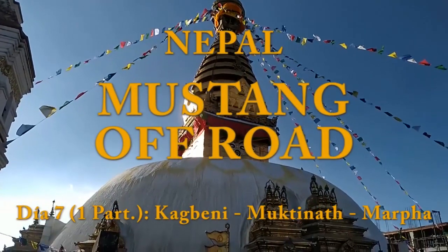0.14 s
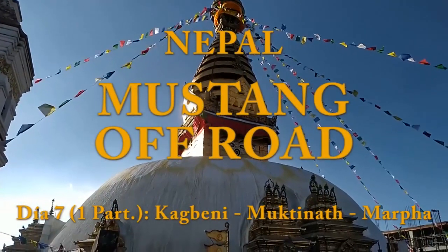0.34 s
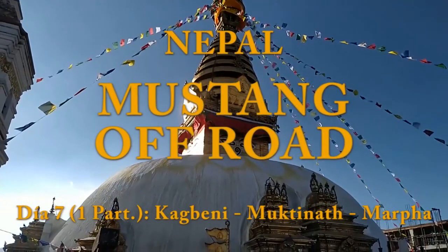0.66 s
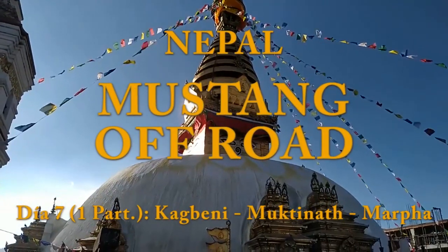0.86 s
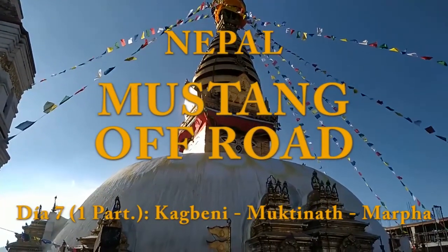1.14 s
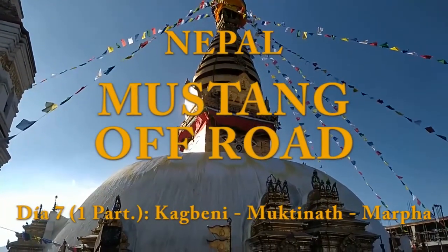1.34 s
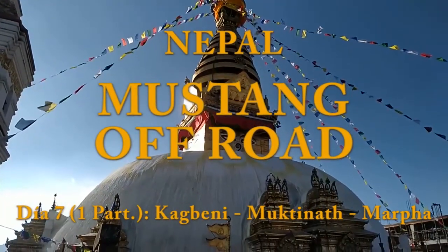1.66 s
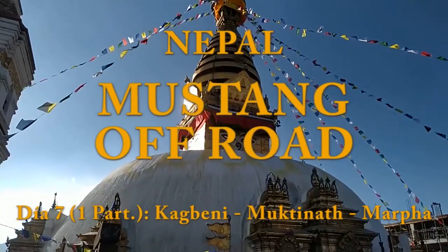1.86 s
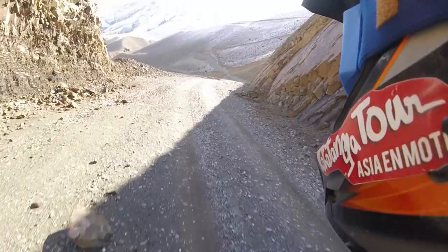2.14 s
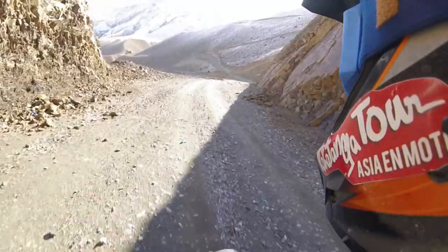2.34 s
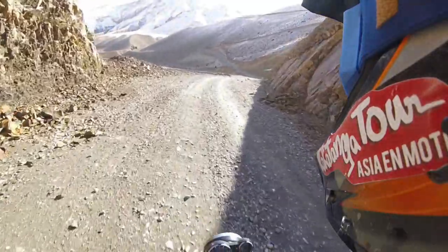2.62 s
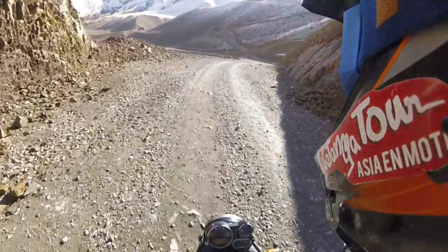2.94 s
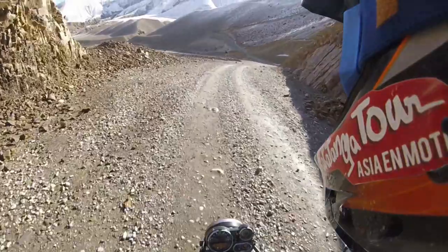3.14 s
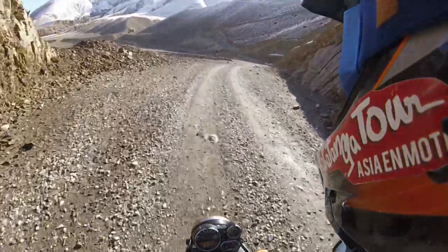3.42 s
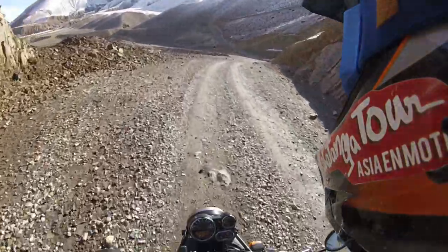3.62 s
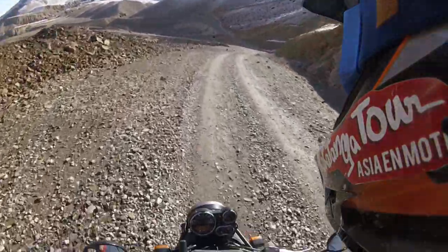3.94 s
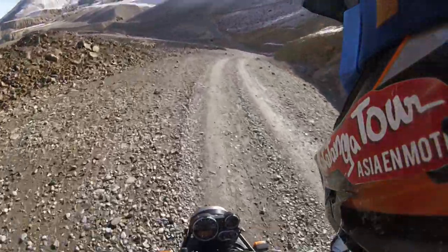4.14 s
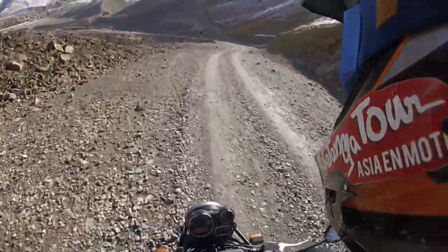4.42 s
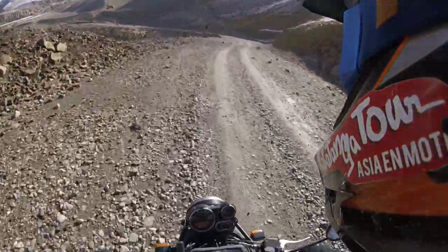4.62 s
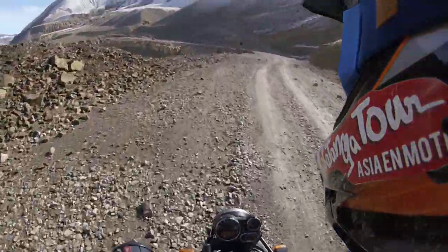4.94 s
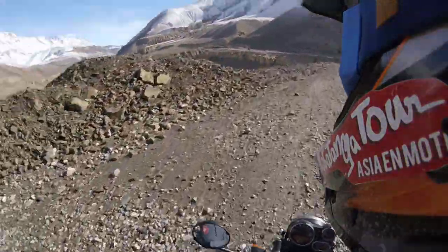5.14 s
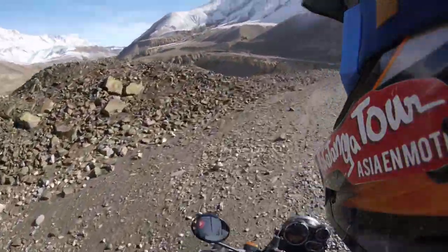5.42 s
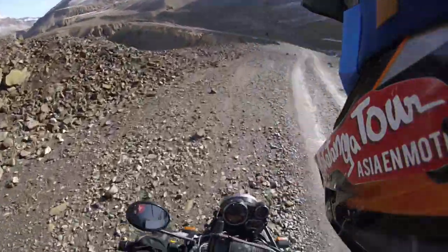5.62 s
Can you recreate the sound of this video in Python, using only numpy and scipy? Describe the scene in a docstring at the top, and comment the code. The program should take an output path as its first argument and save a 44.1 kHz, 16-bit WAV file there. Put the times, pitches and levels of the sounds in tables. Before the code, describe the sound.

From the passenger's seat, a single-cylinder motorcycle rides a gravel track. Its engine climbs steadily with low exhaust thuds, casting rattle, gear whine and bright valve sizzle, while wind rumbles and slaps the microphone. It then slows to distinct thumps as the wind drops, loose metal clinks on bumps, and revs and wind return in a bend.

```python
"""A single-cylinder motorcycle rides along a gravel track, heard from the passenger's seat.
The engine pulls, eases off to separate thumps and picks up again: one crank times its exhaust pulses,
its rattling castings, its whining gears and the tick and sizzle of its valve gear, all made from shaped noise and tones.
Gusty wind, built from eddies of three sizes and single slaps, drops as the bike slows and returns from the side in a bend.
The tyres crunch, single bright ticks stand out and loose metal clinks on the bumps, as short bursts of coloured noise."""
import sys
import numpy as np
from scipy import signal
from scipy.fft import rfft, irfft
from scipy.io import wavfile

SR = 44100
rng = np.random.default_rng(int(sys.argv[2]) if len(sys.argv) > 2 else 0)


def bounce(signal):
    """Save signal as a 16-bit WAV file at the path given by the first command-line argument."""
    frames = np.transpose(np.atleast_2d(signal))
    limited = np.clip(frames, -1, 1)
    pcm = np.round(limited * 32767).astype(np.int16)
    wavfile.write(sys.argv[1], SR, pcm)


N = 254192
TIME = np.arange(N) / SR


def amp(db):
    """Turns decibels into a gain."""
    return 10 ** (np.asarray(db) / 20)


def unit(x):
    """Scales a sound to an average strength (rms) of 1."""
    return x / np.sqrt(np.mean(x ** 2) + 1e-20)


def curves(rows):
    """Draws straight lines between the rows of a table: one value per sample for each column after the time."""
    times, *columns = np.transpose(rows)
    return [np.interp(TIME, times, column) for column in columns]


def add(mix, start_s, sound):
    """Mixes a short sound into a longer one at the given time."""
    part = mix[max(round(start_s * SR), 0):][:len(sound)]
    part += sound[:len(part)]


def colour(x, spectrum, size=8192):
    """Filters a sound to the given spectrum with energy 1; a click rings only after it lands."""
    pitch_hz, level_db = np.transpose(spectrum)
    bins_hz = abs(np.fft.fftfreq(size, 1 / SR))
    gain_db = np.interp(np.log(bins_hz + 1), np.log(pitch_hz), level_db)
    # minimum phase: the filter answers as early as it can
    log_response = np.conj(signal.hilbert(np.log(amp(gain_db))))
    ring = np.fft.ifft(np.exp(log_response)).real[:size // 2]
    return signal.oaconvolve(x, ring / np.linalg.norm(ring))[:N]


def resonate(x, pitch_hz, width_hz):
    """Rings one mode of energy 1; a narrower mode rings longer."""
    r = np.exp(-np.pi * width_hz / SR)
    pole = r * np.exp(2j * np.pi * pitch_hz / SR)
    return np.sqrt(2 * (1 - r * r)) * signal.lfilter([1], [1, -pole], x).real


def noise():
    """White noise of rms 1."""
    return rng.standard_normal(N)


def drift(hz):
    """Slow random wandering of rms 1, with changes up to about hz."""
    lowpass = np.exp(-(np.fft.rfftfreq(N, 1 / SR) / hz) ** 2)
    return unit(irfft(rfft(noise()) * lowpass, N))


def steady(x, span_s):
    """Evens out swells slower than span_s, leaving an rms of about 1."""
    window = signal.windows.hann(int(span_s * SR))

    def local_sum(v):
        return signal.fftconvolve(v, window, "same")

    power = abs(local_sum(x ** 2) / local_sum(np.ones(N)))
    return x / np.sqrt(power + 1e-12)


def swell(centre_s, length_s):
    """A smooth rise to 1 and fall back to 0."""
    return np.cos(np.pi * np.clip((TIME - centre_s) / length_s, -.5, .5)) ** 2


def side_wind():
    """How far the wind has swung to the side in the bend, from 0 to 1."""
    start_s, turn_s = 5.14, 0.31
    return np.clip((TIME - start_s) / turn_s, 0, 1)


def spike(t, width_s, front=0.26):
    """The pressure of a passing vortex: a trough, a steep front, a pointed peak and a shallow trough."""
    tip_s, front_s = .00018, .00025
    distance = (np.hypot(t, tip_s) - tip_s) / width_s
    shape = 1 - distance + front * np.tanh(t / front_s)
    return shape * np.exp(-distance) * signal.windows.hann(len(t))


# strength of the airflow over the microphone: time_s, level_db
AIRFLOW = [(0, -27.5), (.25, -30.5), (.55, -28.5), (.8, -26), (1.2, -27), (1.6, -23.5), (1.85, -23),
           (2.3, -22), (2.65, -20), (3.1, -22.5), (3.35, -26), (3.75, -30), (4.1, -36), (4.45, -41),
           (4.79, -37), (4.87, -30.5), (5.0, -27), (5.18, -24), (5.76, -26.5)]
# single gusts: centre_s, length_s, rumble_lift_db, rush_lift_db
GUSTS = [(0.05, 0.086, 3, 1), (0.674, 0.16, 5.5, 1), (0.943, 0.21, 3, 3.5), (1.64, 0.15, 3.5, -1),
         (1.732, 0.061, 4, 5), (1.91, 0.089, 7.5, -0.5), (2.147, 0.27, 0.5, 3), (2.48, 0.2, 0, 0.5),
         (2.667, 0.11, 2.5, 3.5), (2.868, 0.21, 1.5, 1), (3, 0.11, 0, 4.5), (3.115, 0.13, 6, 3.5),
         (3.265, 0.048, 16, -4.5), (3.502, 0.076, 0, 3), (5.063, 0.095, 11, -3.5), (5.19, 0.16, 3, 4.5),
         (5.28, 0.059, 9, 0.5), (5.348, 0.049, -3.5, 7), (5.452, 0.094, -1, 7.5), (5.515, .07, 1.5, 9),
         (5.574, .04, 8, 3), (5.757, 0.22, 8, 3)]
# brief lulls between gusts: centre_s
LULLS = [.58, 1.57, 2.07, 3.34, 3.57, 3.65, 3.96, 5.306, 5.41, 5.62]


def eddy_levels(large_db=-21.0, middle_db=0.4, small_db=-17.0):
    """Levels in dB of three eddy sizes: all follow the airflow, the small ones more than the large."""
    large_slope, small_slope = 0.2, 0.84  # dB per dB of airflow
    lull_s, lull_db = 0.13, -2.5
    bend_rumble_db, bend_buffet_db, bend_tear_db = 7, -0.5, 1.5
    air = curves(AIRFLOW)[0]
    bend = side_wind()
    lull = lull_db * sum(swell(s, lull_s) for s in LULLS)
    rumble = lull + sum(db * swell(s, length) for s, length, db, _ in GUSTS)
    rush = lull + sum(db * swell(s, length) for s, length, _, db in GUSTS)
    return (large_db + large_slope * air + bend_rumble_db * bend + rumble,
            middle_db + air + bend_buffet_db * bend + rush,
            small_db + small_slope * air + bend_tear_db * bend + rush)


def crackle(levels, per_s=240, spread_db=2.0, level_db=-14.0, width_s=0.0003, bend_db=7.5):
    """Tiny vortices burst on the microphone port as separate cracks, stronger in the side wind."""
    t = np.arange(-SR // 200, SR // 200) / SR
    hits = rng.random(N) < per_s / SR
    sizes = hits * amp(spread_db * np.minimum(rng.exponential(1, N), 2.5))
    cracks = unit(signal.oaconvolve(sizes, spike(t, width_s), "same"))
    return amp(levels + level_db + bend_db * side_wind()) * cracks


# spectra of the large, middle and small eddies: pitch_hz, level_db (per Hz)
LARGE = [(8, -28.5), (20, -6), (35, -3), (65, -2.5), (100, -3), (140, -10), (250, -24), (600, -102.5)]
MIDDLE = [(50, -30), (100, -7.5), (150, 0), (220, -4.5), (300, -9), (400, -13), (550, -23), (1000, -60.5),
          (2500, -89.5)]
SMALL = [(250, -11), (430, -0.5), (560, 0.5), (750, -1.5), (1000, -8), (1400, -16), (2000, -28.5),
         (3000, -36), (4500, -52), (9000, -79.5)]


def wind(crest_db=2.0, tear_db=3.5, flutter_db=1.5, snaps=0.53, snaps_per_s=260):
    """Eddies cross the microphone in quick throbs; the smaller ones break off the crests of the larger."""
    throb_db, throb_hz = 1.8, 24
    calm_s, calm_db = .028, -3.5
    large_level, middle_level, small_level = eddy_levels()
    throbs = throb_db * np.tanh(drift(throb_hz))
    large = steady(colour(noise(), LARGE), 0.25)
    buffets = colour(noise() * amp(crest_db * large), MIDDLE)
    middle = steady(buffets * amp(throbs), 0.15)
    crests = np.clip(unit(large + 1.13 * middle), -2.5, 2.5)
    # the tightest eddies pass as separate snaps
    spikes = (rng.random(N) < snaps_per_s / SR) * rng.random(N)
    tearing = (noise() + snaps * unit(spikes)) * amp(tear_db * crests + flutter_db * drift(49))
    small = steady(colour(tearing, SMALL), 0.24)
    # the stream runs smooth for a moment ahead of each slap
    lead_ins = sum(swell(s - calm_s / 2, calm_s) for s, _, _ in SLAPS)
    calm = calm_db * np.minimum(lead_ins, 1)
    return (large * amp(large_level) + middle * amp(middle_level + calm)
            + small * amp(small_level + calm) + crackle(small_level + calm))


# single slaps of air: peak_time_s, level_db, width_s (how quickly each side dies away)
SLAPS = [(1.103, -13.5, 0.00051), (1.312, -13.5, 0.00033), (1.381, -6.5, 0.0022), (1.564, -13.5, 0.00041),
         (1.701, -18, 0.00082), (1.753, -21, 0.00063), (1.816, -9, 0.0017), (1.868, -12.5, 0.00065),
         (1.896, -7.5, 0.0011), (1.917, -5.5, 0.0011), (2.231, -9.5, 0.0007), (2.659, -13, 0.0011),
         (2.686, -11, 0.0011), (2.74, -13, 0.00081), (2.783, -13, .0012), (2.98, -10, 0.001),
         (2.991, -10, 0.00073), (3.038, -7.5, 0.00081), (3.129, -9, 0.0018), (3.257, -7, 0.002),
         (3.3055, -4.5, 0.0016), (3.382, -6.5, 0.0022), (3.445, -12, 0.00073), (3.494, -19, 0.0021),
         (3.512, -12.5, 0.0011), (3.62, -7, 0.002), (3.667, -16, 0.0016), (3.684, -12, 0.00041),
         (3.75, -13, 0.0035), (3.825, -13.5, 0.0011), (3.855, -17.5, 0.0015), (5.026, -7, 0.0021),
         (5.064, -15, 0.00047), (5.171, -12.5, .0007), (5.186, -16, .0006), (5.211, -15, 0.00031),
         (5.25, -12, 0.00077), (5.325, -16.5, 0.00034), (5.352, -5, 0.002), (5.396, -14, 0.00085),
         (5.439, -11.5, 0.0004), (5.449, -15.5, 0.0004), (5.458, -11.5, 0.00076), (5.478, -15, 0.00034),
         (5.506, -14, 0.0006), (5.517, -10, 0.00037), (5.529, -17, 0.0002), (5.533, -14, 0.0012),
         (5.584, -17, 0.0017), (5.65, -20, 0.00043), (5.669, -15.5, 0.00029), (5.695, -9.5, 0.0033),
         (5.722, -15, 0.00021), (5.745, -16, 0.0007)]


def slaps(wake_db=-26.5, wake_s=0.01, thump_db=-18.5):
    """Tight vortices hit the port one by one, each trailing a short wake of middle and small eddies."""
    hits, wakes = np.zeros(N), np.zeros(N)
    t = np.arange(-SR // 100, SR // 100) / SR
    wake = np.exp(-np.arange(SR // 20) / SR / wake_s)
    for s, db, width_s in SLAPS:
        add(hits, s + t[0], amp(db) * spike(t, width_s))
        add(wakes, s, amp(db) * wake)
    hiss = amp(wake_db) * colour(wakes * noise(), SMALL)
    thump = amp(thump_db) * colour(wakes * noise(), MIDDLE)
    return hits + hiss + thump


def gravel(per_s=70, spread_db=8.0, level_db=-24.0, grain_s=0.00079):
    """Small stones crack under the tyres in clumps of short grains; the level follows the sizzle."""
    hits = rng.random(N) < per_s * amp(4 * drift(12)) / SR
    sizes = hits * amp(spread_db * np.minimum(rng.exponential(1, N), 3))
    grains = signal.lfilter([1], [1, -np.exp(-1 / (grain_s * SR))], sizes) * noise()
    return amp(curves(SIZZLE)[0] + level_db) * unit(colour(grains, METAL))


# loose metal on the bumps, before it rings: start_s, strike_db, chatter_db, frame_knock_db
CLINKS = [(2.667, -46, -56, -52), (4.7225, -26, -42, -44), (4.734, -31, -38, -48), (4.742, -36, -48, -54),
          (4.8083, -30, -41, -51), (4.8105, -28.5, -46, -49), (4.832, -36, -43, -58),
          (4.918, -40, -45, -60), (4.924, -36, -50, -62), (5.133, -35, -55, -63), (5.231, -32, -40, -60),
          (5.312, -36, -46, -60), (5.3145, -35, -48, -62)]
# spectra of the loose metal and of the frame: pitch_hz, level_db (per Hz)
METAL = [(1200, -12), (2500, -34), (3500, -21.5), (4400, -34), (5300, -11), (6000, -16), (6500, 6),
         (7300, -0.5), (8500, -12.5), (10000, -29), (11000, -47), (14000, -65)]
FRAME = [(300, -16), (1200, 3), (2500, -5), (3500, 1.5), (4400, -25), (6000, -32), (12000, -68)]


def clinks(chatter_s=0.011, strike_s=0.0011, bounces_per_s=350, knock_s=0.0072, detune=0.028,
           ring=0.52, ring_hz=6600, ring_width_hz=90, ping=0.1, ping_hz=5400, ping_width_hz=260):
    """Bumps strike loose metal, which chatters in bounces, rings in two modes and knocks the frame."""
    force, rings, knocks = np.zeros(N), np.zeros(N), np.zeros(N)
    t = np.arange(SR // 4) / SR
    for s, strike_db, chatter_db, knock_db in CLINKS:
        scrape, chatter = rng.standard_normal((2, len(t)))
        bounces = unit(np.sign(chatter) * (rng.random(len(t)) < bounces_per_s / SR))
        strike = amp(strike_db) * np.exp(-t / strike_s) * scrape
        blow = strike + amp(chatter_db) * np.exp(-t / chatter_s) * bounces
        # both modes ring at a slightly different pitch each time
        high, low = 1 + detune * rng.uniform(-1.1, 1, 2)
        add(force, s, blow)
        add(rings, s, ring * resonate(blow, ring_hz * high, ring_width_hz)
            + ping * resonate(blow, ping_hz * low, ping_width_hz))
        add(knocks, s, amp(knock_db) * np.exp(-t / knock_s) * scrape)
    # soften the ringing above 8500 Hz
    rings = signal.sosfilt(signal.butter(4, 8500, fs=SR, output="sos"), rings)
    return colour(force, METAL) + rings + colour(knocks, FRAME)


# single bright ticks, many of them probably from the valve gear: start_s, level_db
TICKS = [(2.823, -40), (2.836, -43), (2.867, -38.5), (2.93, -42), (2.961, -37), (2.985, -36), (3.091, -38),
         (3.192, -41), (3.225, -40), (3.391, -41), (3.479, -46), (3.512, -38), (3.527, -45), (3.739, -40),
         (4.294, -39), (4.377, -40), (4.445, -40), (4.784, -40), (4.835, -39), (4.882, -45), (4.93, -45),
         (5.064, -42), (5.678, -50)]
# spectrum of the ticks: pitch_hz, level_db (per Hz)
TICK_SPECTRUM = [(2000, -24), (4400, -20.5), (5500, -24), (6100, -5), (6600, 3), (7500, -7), (9000, -8.5),
                 (10200, -13), (11000, -37), (14000, -52)]


def ticks(decay_s=0.0069):
    """Single bright ticks, many probably from the valve gear, each a burst of noise that dies away."""
    force, t = np.zeros(N), np.arange(SR // 10) / SR
    for s, db in TICKS:
        add(force, s, amp(db) * np.exp(-t / decay_s))
    return colour(force * noise(), TICK_SPECTRUM)


def stroke(cycle, at, length):
    """A burst that starts at a fixed share of every engine cycle and dies away."""
    return np.exp(-((cycle - at) % 1) / length)


# brightness of the valve gear: time_s, sizzle_db
SIZZLE = [(0, -49), (.7, -44), (2.1, -43), (2.42, -41), (2.6, -41.5), (2.67, -45), (2.76, -45), (2.82, -43),
          (3, -43.5), (3.3, -46), (4.3, -46), (4.9, -47), (5.45, -52.5), (5.76, -49)]
# spectrum of the valve gear: pitch_hz, level_db (per Hz)
VALVES = [(3000, -49.5), (4400, -30), (5000, -17), (5600, -12.5), (6080, -11), (6450, 3), (6750, 1.5),
          (7100, -3.5), (8000, -10.5), (9200, -12.5), (10100, -19.5), (10900, -36), (12500, -40),
          (14000, -49)]


def valve_gear(cycle, uneven_db=1.5, ring=0.32, flutter_db=0.05, tappet=0.73, tappet_s=0.0055):
    """Two tappet strokes a cycle stand out of the chain's bright sizzle;
    two narrow high resonances, probably of the microphone port, ring in it."""
    length = tappet_s * curves(SPEED)[0]  # seconds to share of a cycle
    taps = tappet * (stroke(cycle, 0.36, length) + 0.26 * stroke(cycle, 0.11, length))
    force = (1 + taps * amp(uneven_db * drift(23))) * amp(flutter_db * drift(25))
    port = resonate(force * noise(), 6489, 60) + 0.59 * resonate(force * noise(), 7220, 60)
    sizzle = unit(colour(force * noise(), VALVES))
    return amp(curves(SIZZLE)[0]) * unit(sizzle + ring * unit(port))


# gear teeth meeting: meshes_per_cycle, level_db (against each other)
GEARS = [(21, 2), (23, 7), (25.5, 1), (32, -2), (34, -10), (41, -4)]


def gear_whine(cycle, waver_db=4.0, jitter=.055, jitter_hz=40):
    """Mesh tones sing out as they pass a resonance of the castings; play between the teeth roughens them."""
    speed, whine = curves(SPEED)[0], np.zeros(N)
    for meshes, db in GEARS:
        lift = sum(amp(gain_db) / np.hypot(1, 2 * (meshes * speed - pitch_hz) / width_hz)
                   for pitch_hz, width_hz, gain_db in CASTINGS)
        turns = meshes * cycle + jitter * drift(jitter_hz)
        whine += lift * amp(db + waver_db * drift(18.0)) * np.sin(2 * np.pi * turns)
    return amp(curves(LOAD)[1]) * unit(whine)


# spectrum of the gears' even rush: pitch_hz, level_db (per Hz)
CASE = [(250, 0), (450, -1), (650, 0.5), (880, 10), (1250, 1.5), (1600, 6), (2000, 2), (2800, -3),
        (3400, -2.5), (3900, -9), (4500, -39), (7000, -47)]
# ringing of the castings: pitch_hz, width_hz, level_db (against each other)
CASTINGS = [(730, 57, -8), (778, 58, 5.5), (1005, 90, 7.5), (1255, 100, -7), (1480, 81, -5),
            (1880, 47, -14.5), (2360, 87, -24), (2630, 110, -19), (3110, 210, -19.5)]


def crankcase(cycle, knock=0.29, ring=1.47, level_db=4.5, uneven_db=3.0, size=400):
    """Moving parts rattle the castings in much the same pattern every cycle, over the even rush of the gears."""
    pattern = np.interp(cycle % 1 * size, np.arange(size), rng.standard_normal(size))
    knocks = 1 + knock * stroke(cycle, 0.55, 0.084)
    rattle = (.5 * noise() + pattern) * knocks * amp(uneven_db * drift(110))
    modes = sum(amp(db) * resonate(rattle, pitch_hz, width_hz) for pitch_hz, width_hz, db in CASTINGS)
    rush = unit(colour(noise(), CASE))
    return amp(curves(LOAD)[1] + level_db) * unit(rush + ring * unit(modes))


# engine levels: time_s, exhaust_db, clatter_db (base for crankcase and gears), silencer_ring_db
LOAD = [(0, -45.5, -51.5, -38), (.6, -33.5, -49.5, -39), (1.5, -28.5, -48.5, -39.5),
        (2.4, -30.5, -46, -30.5), (3, -28, -49.5, -38), (3.6, -27.5, -52, -40), (4.0, -27, -52, -43),
        (4.25, -25.5, -52, -51), (4.65, -31.5, -53.5, -44), (5, -25.5, -54.5, -52), (5.4, -41, -56, -38.5),
        (5.76, -42, -60, -27.5)]
# spectra of the exhaust pipe and of the silencer: pitch_hz, level_db (per Hz)
PIPE = [(20, -35), (45, -19.5), (70, 0.5), (95, -1), (120, -2), (150, -9.5), (200, -22), (245, -19.5),
        (295, -10), (340, -20.5), (450, -34), (900, -43.5), (2500, -72), (10000, -110)]
SILENCER = [(60, -32), (130, -6.5), (180, -1), (230, -18.5), (265, -6), (295, -1.5), (330, -18),
            (420, -18.5), (700, -21.5), (1200, -34.5), (4000, -76)]


def exhaust(cycle, intake=0.089, uneven_db=1.2, puff=.15):
    """Each firing sends a pressure pulse and a puff of gas through pipe and silencer; the intake gulps later."""
    def pulse(at):
        return np.diff(np.floor(cycle - at), prepend=np.floor(-at))

    pulses = (pulse(0) - intake * pulse(0.26)) * amp(uneven_db * drift(23))
    gas = unit(stroke(cycle, 0, 0.35) * noise())
    drive = unit(pulses) + puff * gas
    pipe_level, _, silencer_level = curves(LOAD)
    pipe = amp(pipe_level) * unit(colour(drive, PIPE))
    return pipe + amp(silencer_level) * unit(colour(drive, SILENCER))


# engine speed: time_s, firings_hz (firings per second, before a slight random wobble)
SPEED = [(0.0, 29.18), (0.5, 30.6), (0.85, 31.09), (1.1, 31.69), (1.5, 32.32), (2.0, 33.45), (2.5, 34.46),
         (2.6, 33.2), (2.72, 28.46), (2.87, 32.81), (3.1, 29.8), (3.4, 30.45), (3.6, 27.55), (4.0, 25.6),
         (4.4, 23.48), (4.6, 21.9), (4.8, 20.71), (5.0, 21.8), (5.25, 24.47), (5.76, 26.21)]


def scene():
    """One crank drives the steady engine sounds; wind, track and single ticks lie over them."""
    wobble = 1 + 0.00324 * drift(14.3)
    cycle = np.cumsum(curves(SPEED)[0] * wobble) / SR
    track = gravel() + clinks()
    engine = valve_gear(cycle) + gear_whine(cycle) + crankcase(cycle) + exhaust(cycle)
    return (wind() + slaps() + track + ticks() + engine)[None]


def record(dry):
    """Cuts off the treble above an edge pitch."""
    edge_hz = 13500
    lowpass = signal.firwin(511, edge_hz, window=("kaiser", 9), fs=SR)
    return signal.oaconvolve(dry, lowpass[None], "same")


dry = scene()
out = record(dry)
bounce(out)
```